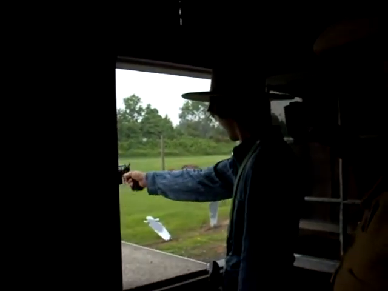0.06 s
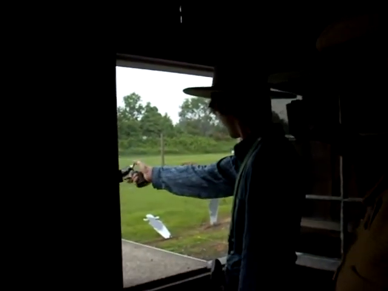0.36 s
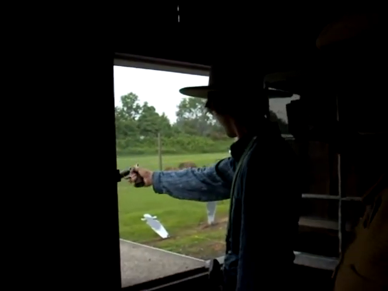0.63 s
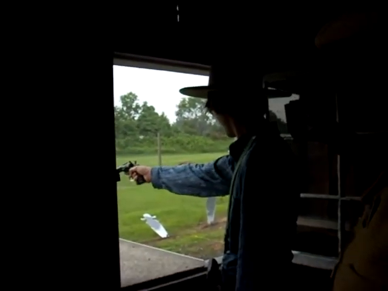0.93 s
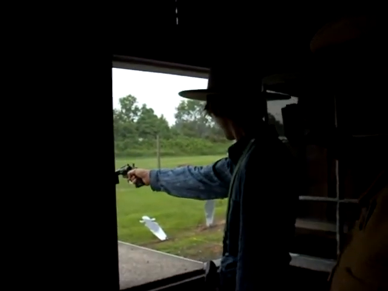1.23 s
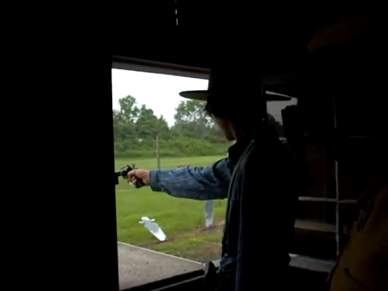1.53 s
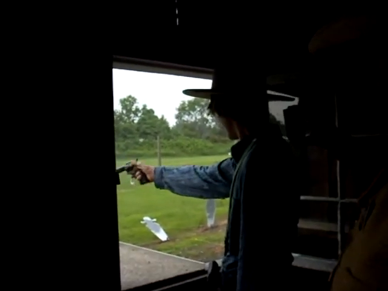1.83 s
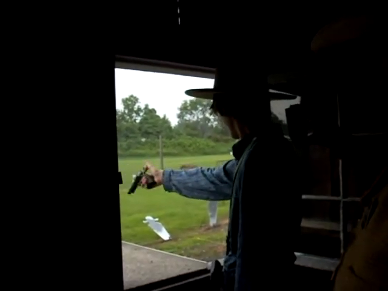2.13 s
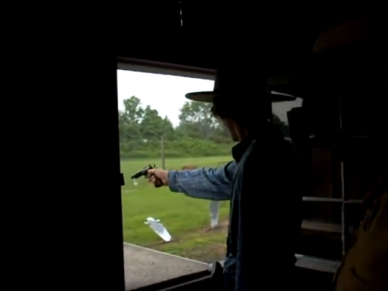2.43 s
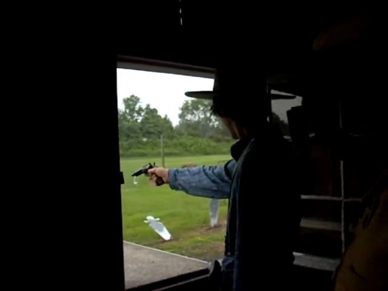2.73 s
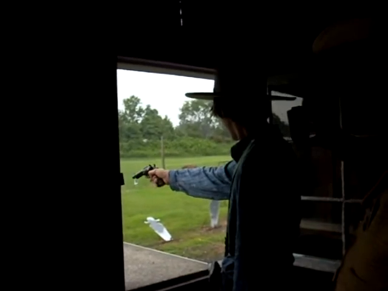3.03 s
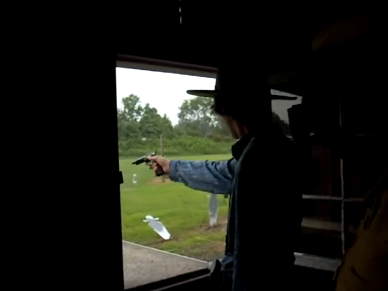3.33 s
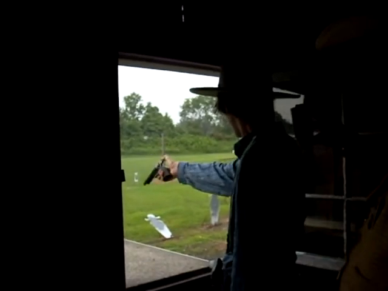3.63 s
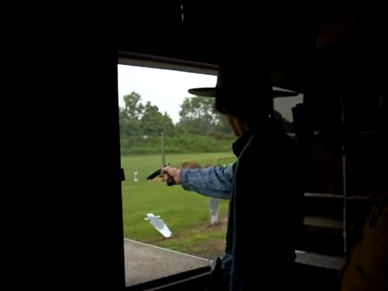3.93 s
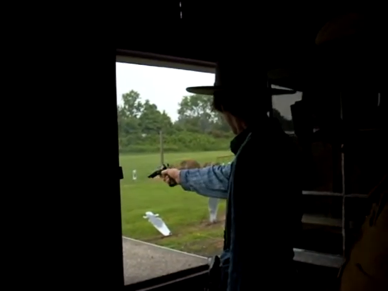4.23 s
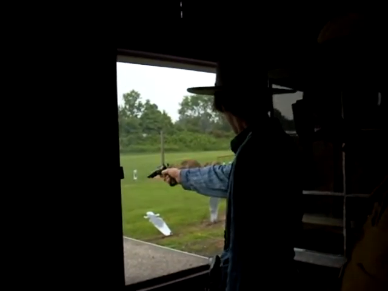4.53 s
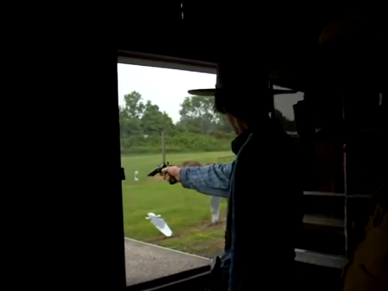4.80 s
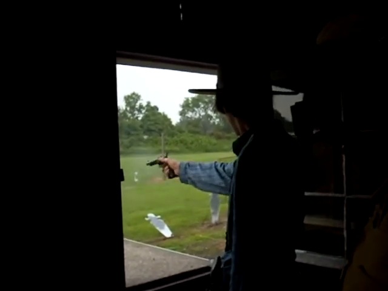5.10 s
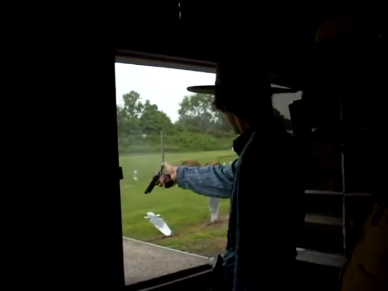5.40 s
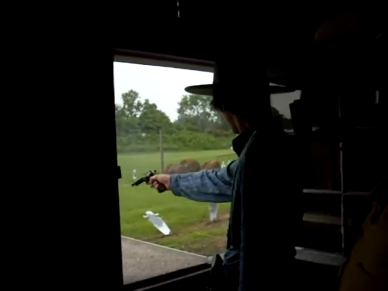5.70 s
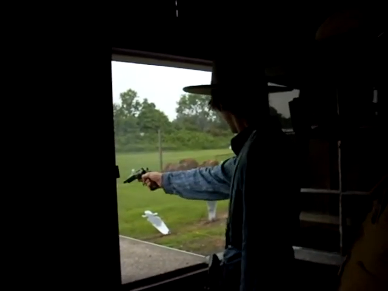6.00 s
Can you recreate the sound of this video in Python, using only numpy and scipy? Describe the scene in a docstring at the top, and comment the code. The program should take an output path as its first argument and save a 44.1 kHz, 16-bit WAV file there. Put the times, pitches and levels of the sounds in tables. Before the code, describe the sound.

A revolver fires four loud shots at steel targets, each followed by a brief metallic ring and hammer clicks, over steady hiss.

```python
"""Revolver on steel plates

A single-action revolver fires four times from a wooden shed on a grass range, over a steady hiss.
Each blast fills the shed, rolls back off the berm and overloads a narrow-band microphone.
The struck plate rings out of the blast's tail, and the far trees return a faint smear.
After each shot the hammer is thumbed back, clicking through its notches."""
import sys
import numpy as np
from scipy import signal
from scipy.fft import rfft, irfft, next_fast_len
from scipy.io import wavfile

SR = 44100
rng = np.random.default_rng(int(sys.argv[2]) if len(sys.argv) > 2 else 0)


def wav_record(signal):
    """Record a signal, one row per channel, as 16-bit PCM in the file named by sys.argv[1]."""
    frames = np.transpose(np.atleast_2d(signal))
    bounded = np.clip(frames, -1, 1)
    # unit amplitude maps onto the largest positive 16-bit level
    quanta = np.round(bounded * 32767).astype(np.int16)
    wavfile.write(sys.argv[1], SR, quanta)


N = 271215
TIME = np.arange(N) / SR
SHOT_SIZE = SR  # a shot dies away within a second


def from_db(db):
    """Decibels to gain."""
    return 10 ** (np.asarray(db) / 20)


def rms_one(x):
    """Scale to unit power."""
    return x / np.sqrt(np.mean(x ** 2) + 1e-20)


def bin_hz(size):
    """Frequencies of a spectrum's bins, floored at 1 Hz."""
    return np.maximum(np.arange(size // 2 + 1) * SR / size, 1)


def add(out, start_s, sound):
    """Mix a sound in at a time."""
    start = int(round(start_s * SR))
    out[start:start + len(sound)] += sound[:N - start]


def shaped_noise(spectrum, size, peaks=()):
    """Unit noise with a smooth spectrum and narrow resonances on top."""
    padded = next_fast_len(size, True)
    hz = bin_hz(padded)
    known_hz, known_db = np.transpose(spectrum)
    smooth_db = np.interp(np.log(hz), np.log(known_hz), known_db)
    peaks_db = sum(lift / (1 + (2 * (hz - centre) / width) ** 2) for centre, width, lift in peaks)
    white = rfft(rng.standard_normal(padded))
    return rms_one(irfft(white * from_db(smooth_db + peaks_db), padded)[:size])


def band_noise(t, low_hz, high_hz):
    """Unit noise in a soft-edged band, as long as t."""
    bandpass = signal.butter(2, [low_hz, high_hz], "band", fs=SR, output="sos")
    return rms_one(signal.sosfilt(bandpass, rng.standard_normal(len(t))))


def fade(t, t60):
    """Exponential decay from t = 0, silent before."""
    return (t >= 0) * np.exp(-np.log(1000) * np.maximum(t, 0) / t60)


def swell(t, rise_s, t60):
    """A scattered arrival: builds up until t = 0, then dies away."""
    return np.where(t < 0, np.exp(-(t / rise_s) ** 2), fade(t, t60))


# Tone of the outdoor air: freq_hz, relative_density_db
HISS_SPECTRUM = [(25, -5.5), (59, -4.5), (86, -7), (200, -8.5), (420, -6), (620, -1.5), (840, -2),
                 (1100, 2), (1860, -3), (3150, -4.5), (3800, -7.5), (4500, -17)]
def hiss(level_db=-30.5, rise_db_per_s=0.19, waver_db=0.4, wavers_per_s=4.4):
    """The bed: open-range hiss that creeps up in level and wavers a little."""
    waver = np.interp(TIME * wavers_per_s, np.arange(64), rng.standard_normal(size=64))
    gain = from_db(level_db + rise_db_per_s * TIME + waver_db * waver)
    return gain * shaped_noise(HISS_SPECTRUM, N)


# Soft bumps at the microphone: peak_s, level_db
MIC_BUMPS = [(1.39, -42.5), (1.54, -42)]
def bumps(rise_s=0.022, t60=0.3):
    """Faint bass bumps that swell and die."""
    rumble = band_noise(TIME, low_hz=35, high_hz=79.7)
    return rumble * sum(from_db(db) * swell(TIME - peak_s, rise_s, t60) for peak_s, db in MIC_BUMPS)


# Hammer pulls, each with its cylinder stop: full_cock_s, level_db, stop_lag_s, stop_relative_db
HAMMER_PULLS = [(0.7252, -17, 0.027, -4.5), (2.308, -16, 0.017, -6.5), (3.8589, -22, 0.013, 1),
                (5.660, -18.5, 0.018, -3)]
# Safety notch, half cock and full cock: before_full_cock_s, relative_db
HAMMER_NOTCHES = [(0.0945, -8), (0.033, -7.5), (0, 0)]
# Ring of the small steel parts: pitch_hz, relative_db, t60_s
LOCKWORK_MODES = [(2380, -3, 0.0153), (3330, 0.5, 0.024), (3650, 1.5, .024), (3740, 5, 0.031),
                  (4200, 3.5, 0.027)]
def lockwork(detune=0.027, scrape_db=-11, scrape_t60=0.082, ring_db=-6):
    """The hammer passes its notches, then the cylinder stop drops; each click rings over a scrape."""
    out, t = np.zeros(N), TIME[:SR // 5]
    for full_cock_s, pull_db, stop_lag_s, stop_db in HAMMER_PULLS:
        clicks = [(-lead_s, db) for lead_s, db in HAMMER_NOTCHES] + [(stop_lag_s, stop_db)]
        for lag_s, click_db in clicks:
            ring = np.zeros(len(t))
            for hz, db, t60 in LOCKWORK_MODES:
                pitch_hz = hz * rng.normal(1, detune)  # the parts shift in pitch as they move
                tone = np.sin(2 * np.pi * (pitch_hz * t + rng.random()))
                ring += from_db(db + ring_db) * tone * fade(t, t60)
            scrape = from_db(scrape_db) * band_noise(t, low_hz=2800, high_hz=4480) * fade(t, scrape_t60)
            add(out, full_cock_s + lag_s, from_db(pull_db + click_db) * (ring + scrape))
    return out


# Bullets on steel; where each lands sets the balance of the modes:
# start_s, swell_s, ring_length_ratio, clank_db, then level_db for each of the five modes
PLATE_HITS = [(0.280, 0.087, 0.85, -5, -24, -3, -20.5, -21.5, -17),
              (1.915, 0.041, 1.02, -4.5, -16.5, -17.5, -30, -22.5, -32),
              (3.405, 0.027, 1.08, -2.5, -19, -21, -8.5, -26, -14),
              (5.168, 0.012, 1.07, -8, -21, -9.5, -13, -29, -14.5)]
# Each plate is tuned a little differently: pitch_ratio
PLATE_PITCH_RATIOS = [1.0, .9965, 1.002, .9955]
# The five modes of a plate: base_pitch_hz
PLATE_PITCHES = [1639, 2509.5, 2855, 3270, 3349]
# How long those modes ring: base_t60_s
PLATE_DECAYS = [0.48, 0.29, 0.38, 0.32, 0.33]
def plates(clank_t60=0.25, clank_attack_s=0.0041):
    """Lead splashes on steel with a noisy clank, and the plate rings on in its modes."""
    out, t = np.zeros(N), TIME[:SHOT_SIZE]
    attack = 1 - np.exp(-t / clank_attack_s)
    for (start_s, swell_s, length, clank_db, *mode_dbs), tuning in zip(PLATE_HITS, PLATE_PITCH_RATIOS):
        clank = from_db(clank_db) * band_noise(t, low_hz=1600, high_hz=3670) * fade(t, clank_t60)
        ring = np.zeros(len(t))
        for hz, t60, db in zip(PLATE_PITCHES, PLATE_DECAYS, mode_dbs):
            # reflections in the shed pile up, so the ring swells before it dies
            envelope = swell(t - swell_s, swell_s, t60 * length)
            ring += from_db(db) * np.sin(2 * np.pi * hz * tuning * t) * envelope
        add(out, start_s, clank * attack + ring)
    return out


def tree_echo(level_db=-36, delay_s=0.63, rise_s=0.26, t60=1.0):
    """The far tree line scatters back a faint smear of the shot, without its bass."""
    t = TIME[:SHOT_SIZE]
    return from_db(level_db) * band_noise(t, low_hz=547, high_hz=3430) * swell(t - delay_s, rise_s, t60)


# Tone of the muzzle blast: freq_hz, relative_density_db
BLAST_SPECTRUM = [(25, -19), (100, -18.5), (200, -6), (330, 0.5), (520, -3), (850, 5.5), (1400, -3.5),
                  (2500, -4.5), (3600, -8.5), (4500, -13)]
# Boxy ring of the wooden shed: pitch_hz, width_hz, lift_db
SHED_RESONANCES = [(125, 9.1, 10), (160.4, 14, 12.5), (295.5, 23, 8.5), (382.4, 19, 5), (445, 12.7, 5),
                   (790, 20, -0.5), (1143, 25, 0.5)]
# Tail of the blast, band by band: centre_hz, t60_s
ROAR_DECAYS = [(50, .17), (160, 0.31), (330, 0.28), (900, 0.26), (2200, 0.27), (4000, 0.25)]
def roar(shed_db, berm_db, berm_delay_s=0.11, berm_rise_s=0.11):
    """Body and tail of the shot: the blast fills the shed, then swells back from the berm."""
    t, log_hz = TIME[:SHOT_SIZE], np.log(bin_hz(SHOT_SIZE))
    spectrum = rfft(shaped_noise(BLAST_SPECTRUM, SHOT_SIZE, SHED_RESONANCES))
    centres_hz, t60s = np.transpose(ROAR_DECAYS)
    out = np.zeros(SHOT_SIZE)
    for solo, t60 in zip(np.eye(len(centres_hz)), t60s):
        crossover = np.interp(log_hz, np.log(centres_hz), solo)  # fades into the neighbouring bands
        band = irfft(spectrum * crossover, SHOT_SIZE)
        shed = from_db(shed_db) * fade(t, t60)
        berm = from_db(berm_db) * swell(t - berm_delay_s, berm_rise_s, t60)
        out += band * np.hypot(shed, berm)  # the two add in power
    return out


def muzzle_blast(thump_db, thump_t60=0.16, crack_db=13, crack_t60=0.035, push_db=-9, push_s=0.035):
    """Front of the shot: a bright crack, a low thump and a slow push of gas."""
    t = TIME[:SHOT_SIZE]
    crack = from_db(crack_db) * band_noise(t, low_hz=900, high_hz=3800) * fade(t, crack_t60)
    thump = from_db(thump_db) * band_noise(t, low_hz=30.3, high_hz=198) * fade(t, thump_t60)
    push = from_db(push_db) * (t / push_s) ** 2 * np.exp(2 * (1 - t / push_s))
    return crack + thump + push


# Shot cues: start_s, shed_roar_db, berm_echo_db, thump_db
SHOT_CUES = [(0.183, 11.5, 0.5, -2), (1.8067, 11, 1.5, 4.5), (3.303, 11.5, 0, 3.5), (5.0553, 8, 2, -15)]
def revolver():
    """Four shots, each layered from the roar, the muzzle blast and the echo off the trees."""
    out = np.zeros(N)
    for start_s, shed_db, berm_db, thump_db in SHOT_CUES:
        add(out, start_s, roar(shed_db, berm_db) + muzzle_blast(thump_db) + tree_echo())
    return out


def scene():
    """Everything that reaches the microphone, in mono."""
    return (revolver() + plates() + lockwork() + hiss() + bumps())[None]


def overload(x, ceiling, hardness):
    """Flatten the peaks against a ceiling, with a rounded knee."""
    return x / (1 + np.abs(x / ceiling) ** (2 * hardness)) ** (.5 / hardness)


def record(dry, edge_hz=3390, stop_hz=4845, ceiling=0.74, coupling_hz=0.29, cutoff_hz=16000):
    """An overloaded speech-band microphone; its output clips again, which makes all the top treble."""
    flattened = overload(dry, ceiling=0.89, hardness=2.1)
    # a linear-phase roll-off keeps the tops flat and leaves a ripple on them
    edge = np.clip((bin_hz(N) - edge_hz) / (stop_hz - edge_hz), 0, 1)
    narrow = irfft(rfft(flattened) * np.cos(np.pi / 2 * edge) ** 3, N)
    clipped = np.clip(narrow, -ceiling, ceiling)
    coupling = signal.butter(1, coupling_hz, "high", fs=SR)  # lets steady pressure leak away
    centred = signal.lfilter(*coupling, clipped)
    steep_lowpass = signal.ellip(8, .05, 50, cutoff_hz, fs=SR, output="sos")
    return signal.sosfiltfilt(steep_lowpass, centred)


dry = scene()
out = record(dry)
wav_record(out)
```